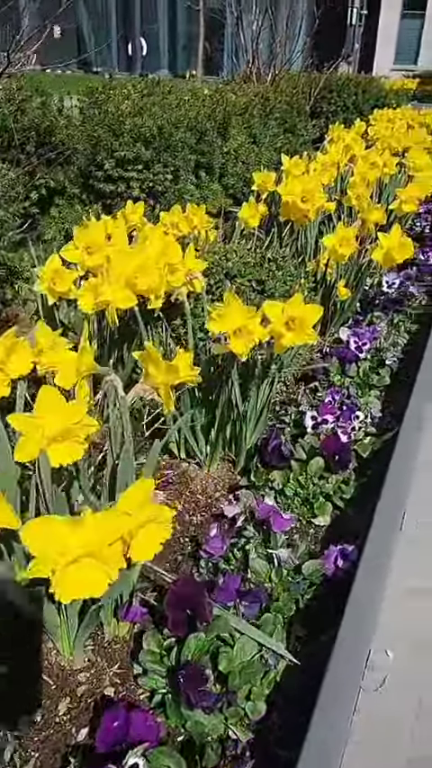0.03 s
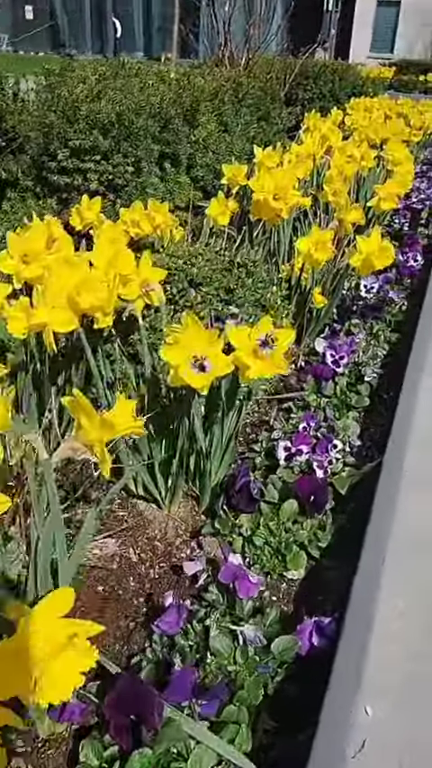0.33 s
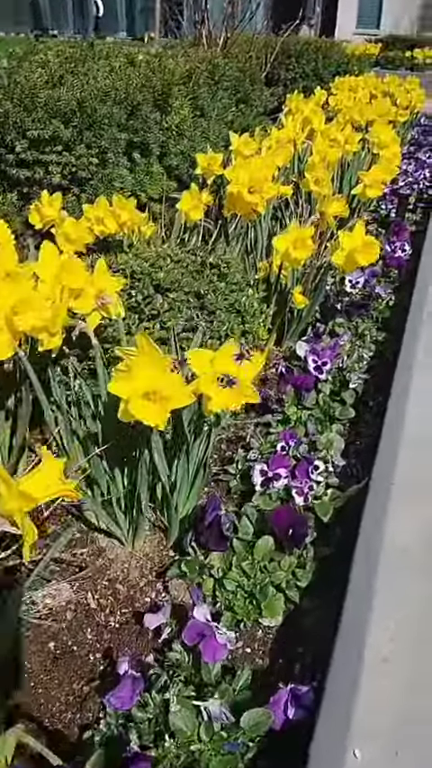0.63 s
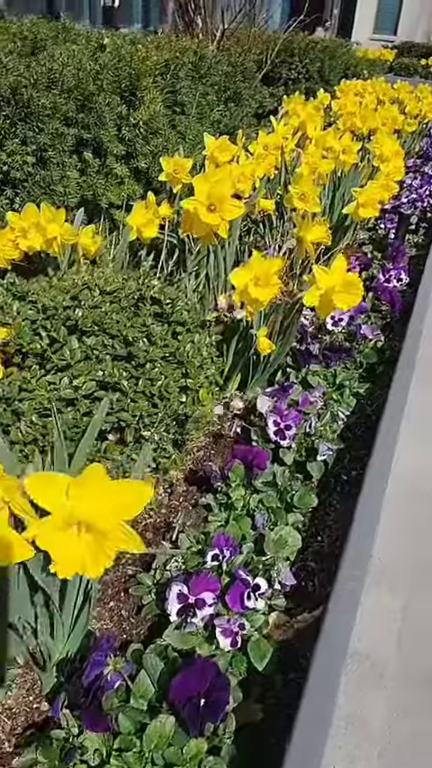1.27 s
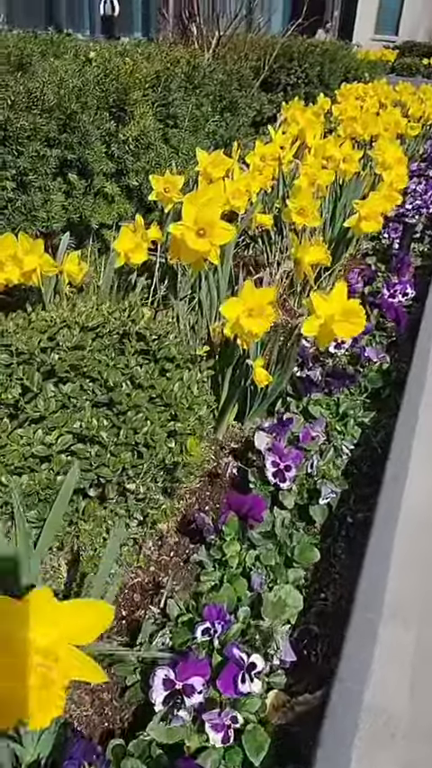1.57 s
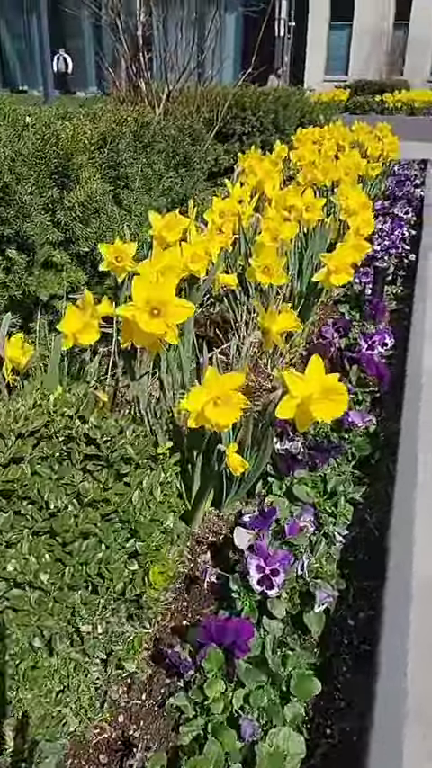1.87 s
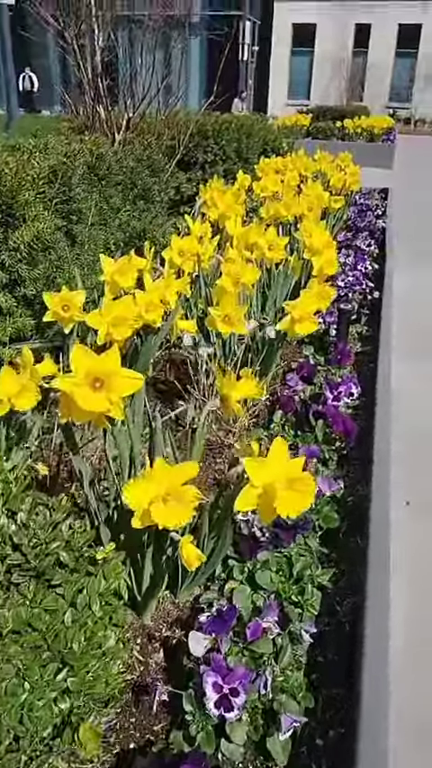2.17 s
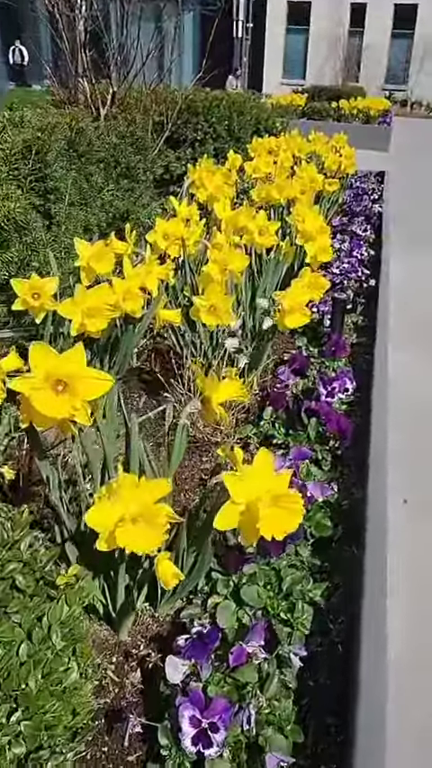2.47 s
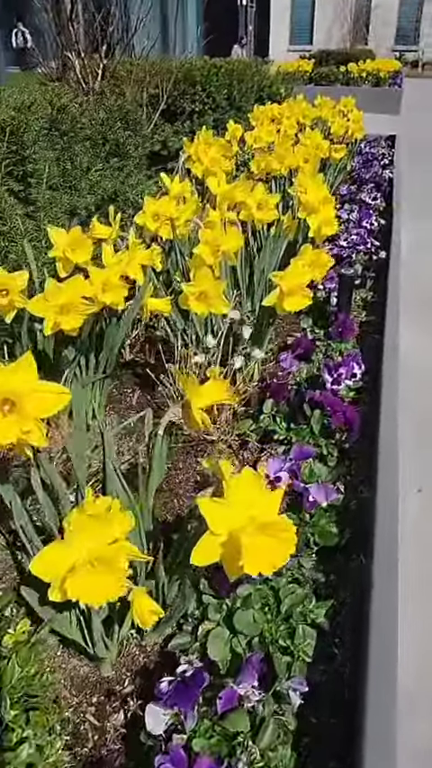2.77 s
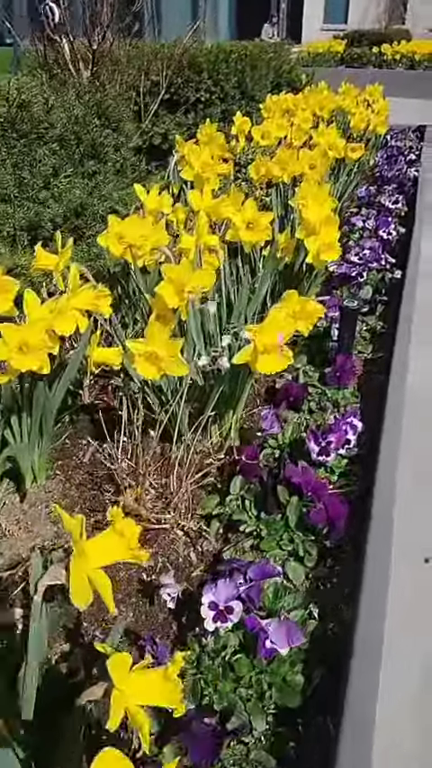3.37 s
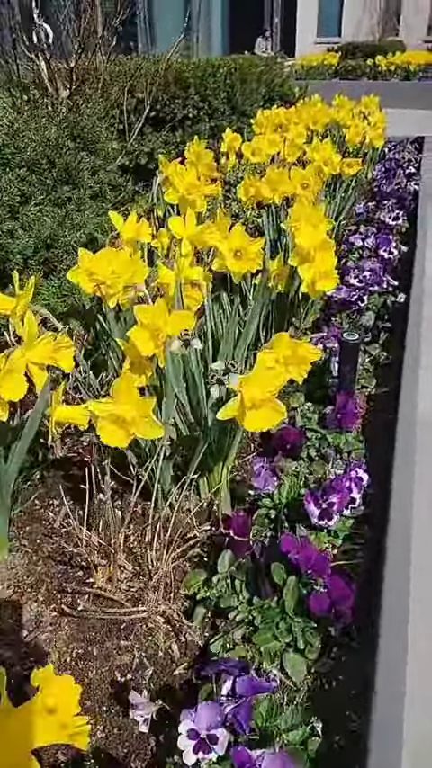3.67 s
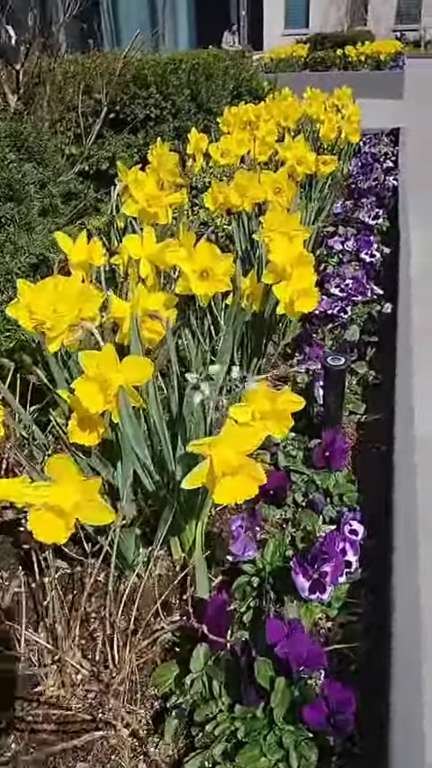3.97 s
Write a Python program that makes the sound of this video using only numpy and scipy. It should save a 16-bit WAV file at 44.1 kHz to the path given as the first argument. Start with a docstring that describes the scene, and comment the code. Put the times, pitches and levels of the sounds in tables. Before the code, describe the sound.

Birds sing in a quiet garden. One near the microphone, to the left, runs through a quick phrase of trills, chips and whistles, then leaves only distant birds calling softly, with a slight echo and faint steady hush.

```python
"""Songbirds in a garden

A bird close by on the left sings one phrase with both sides of its syrinx, two independent oscillators:
a burr, chips, paired whistles and an arch. Farther birds answer with thin buzzes, slurs and low whistles.
Walls and hedges reflect the song over a faint, steady background hush."""
import sys
import numpy as np
from scipy import signal
from scipy.fft import rfft, irfft
from scipy.io import wavfile
from scipy.ndimage import uniform_filter1d

SR = 44100
rng = np.random.default_rng(int(sys.argv[2]) if len(sys.argv) > 2 else 0)


def unload_wav(signal):
    """Save mono or channel-first audio to the path in sys.argv[1] as 16-bit WAV at rate SR, clipped to [-1, 1]."""
    wavfile.write(
        sys.argv[1],
        SR,
        np.round(np.clip(np.atleast_2d(signal).T, -1, 1) * 32767).astype(np.int16),
    )


N = 176400
NEAR_EDGE_S, FAR_ATTACK_S, FAR_RELEASE_S = 0.002, 0.004, 0.028
EARLY_DELAY_S, TAIL_DELAY_S = 0.003, 0.024
ANTIPHASE = np.array([[1], [-1]])


def undb(db):
    """Amplitude ratio of a level in decibels."""
    return 10 ** (np.asarray(db) / 20)


def unit(x):
    """Normalisation to unit rms."""
    return x / np.sqrt(np.mean(x ** 2))


def jitter(rate, size):
    """Interpolated noise of about unit spread, with rate new values a second."""
    at = np.arange(size) * rate / SR
    return 1.2 * np.interp(at, np.arange(N // 10), rng.standard_normal(N // 10))


def colour(x, points):
    """Zero-phase filtering through (f/Hz, gain/dB) points."""
    hz, db = np.array(points, float).T
    f = np.maximum(np.arange(N // 2 + 1) * SR / N, 1)
    return irfft(rfft(x) * undb(np.interp(np.log(f), np.log(hz), db)), N)


def pan(db):
    """Interaural level difference as two gains; positive is left."""
    return undb(ANTIPHASE * db / 2)


def add(track, start, x):
    """Superposition of x on a track from a start time in seconds."""
    i = int(start * SR)
    a, b = max(i, 0), min(i + len(x), N)
    if b > a:
        track[a:b] += x[a - i:b - i]


def contours(rows):
    """Linear interpolation of a note's rows in time, one curve per column."""
    times, *columns = np.array(rows, float).T
    times = np.sort(times)
    t = np.arange(times[0], times[-1] + NEAR_EDGE_S, 1 / SR)
    return [np.interp(t, times, c) for c in columns]


# Faint background hush, with a thin hiss in the top treble: f/Hz, relative level/dB
HUSH_SPECTRUM = [(35, -48), (69, -27.5), (190, -38), (438, -28.5), (520, -22), (950, -9), (1350, -13.5),
                 (2100, -7.5), (4350, -6.5), (5860, -5.5), (6810, -14), (7520, -9), (8310, -11),
                 (12700, -12), (15500, -17)]
# Spread of the hush in the mix, with the thin hiss centred: f/Hz, side level re mid/dB
HUSH_SPREAD = [(60, -16), (200, 0), (700, -4.5), (1300, 0), (4400, -3), (7500, 1), (9000, -27.5),
               (15000, -38)]


def hush():
    """Stationary noise, partly coherent between channels: centred in the bass and top treble."""
    mid, side = (unit(colour(rng.standard_normal(N), HUSH_SPECTRUM)) for _ in range(2))
    return undb(-57.5) * (mid + colour(side, HUSH_SPREAD) * ANTIPHASE)


# Second and third harmonics: level re fundamental/dB
HARMONICS = [-37.5, -46.5]


def syrinx(hz, db, roughness, attack=NEAR_EDGE_S, release=NEAR_EDGE_S):
    """One side of a syrinx: a nearly sinusoidal oscillator, roughened by random modulation."""
    jitter_hz, pitch_spread, level_spread_db = 500, 0.0565, 7.5
    t = np.arange(len(hz)) / SR
    hz = hz * (1 + pitch_spread * roughness * jitter(jitter_hz, len(t)))
    db = db + level_spread_db * roughness * jitter(jitter_hz, len(t))
    phase = 2 * np.pi * np.cumsum(hz) / SR
    overtones = sum(undb(d) * np.sin(k * phase) * (k * hz < SR / 2) for k, d in enumerate(HARMONICS, 2))
    gate = np.clip(t / attack, 0, 1) * np.clip((t[-1] - t) / release, 0, 1)
    return np.sqrt(2) * (np.sin(phase) + overtones) * gate * undb(db)


# Far gliding notes: t/s, duration/s, first f/Hz, last f/Hz, source level/dB, roughness (0-1)
FAR_SLURS = [(0, 0.083, 2700, 2550, -52.5, 0.51), (0.469, 0.24, 1931, 1796, -58.5, 0.56),
             (0.703, 0.053, 5594, 5260, -46, 0.14), (2.019, 0.077, 2460, 2457, -65.5, 0),
             (2.05, 0.055, 5160, 4420, -59, 0), (2.25, 0.13, 3070, 3150, -68, 0.58),
             (2.328, .045, 5770, 5150, -63, 0.2), (2.424, 0.08, 5700, 4830, -61, 0.1),
             (2.53, 0.057, 3570, 3610, -62, 0.5), (2.748, 0.11, 3590, 3435, -67, .3),
             (2.605, 0.11, 5400, 4570, -62, 0.1), (0.799, 0.34, 4326, 4467, -52.5, 0.23),
             (2.891, 0.25, 2144, 2076, -64, 0.18), (3.31, 0.1, 2480, 2470, -56, 0.24),
             (3.45, 0.085, 2480, 2483, -57.5, 0.13), (3.391, 0.15, 5540, 4480, -61.5, 0.3),
             (3.533, 0.12, 2158, 1993, -61.5, 0.3), (3.633, .12, 5220, 4350, -64, 0.65),
             (2.994, 0.051, 4300, 4150, -62, 0.4), (3.673, 0.41, 2254, 2312, -57, 0.14),
             (3.809, 0.064, 2383, 2338, -57.5, 0.26)]


def slurs():
    """Power-law frequency glides: fast at first, then levelling out."""
    song = np.zeros(N)
    for start, length, first, last, db, roughness in FAR_SLURS:
        t = np.arange(0, length, 1 / SR)
        hz = last + (first - last) * (1 - t / length) ** 2.3
        add(song, start, syrinx(hz, db, roughness, FAR_ATTACK_S, FAR_RELEASE_S))
    return song


# Far thin buzzes: t/s, duration/s, carrier f/Hz, source level/dB, deviation/Hz
FAR_BUZZES = [(0, 0.046, 7570, -54, 314), (0.163, 0.097, 7690, -55.5, 250), (0.319, 0.12, 7420, -54, 208),
              (0.394, 0.22, 7330, -60.5, 148), (3.217, 0.085, 7720, -57.5, 416),
              (3.234, 0.09, 6870, -56.5, 320), (3.39, 0.11, 7760, -55, 331),
              (3.43, 0.091, 7070, -55.5, 400), (3.585, 0.13, 7590, -52.5, 280),
              (3.64, 0.06, 6910, -52.5, 350), (3.9, 0.11, 7570, -64, 410)]


def buzzes(rate_hz=100, roughness=0.548):
    """Fast frequency modulation spreads a high carrier into sidebands, heard as a buzz."""
    song = np.zeros(N)
    for start, length, carrier, db, deviation in FAR_BUZZES:
        t = np.arange(0, length, 1 / SR)
        hz = carrier + deviation * np.sin(2 * np.pi * rate_hz * t)
        add(song, start, syrinx(hz, db, roughness, FAR_ATTACK_S, FAR_RELEASE_S))
    return song


# Near trilled notes, by name: t/s, carrier f/Hz, source level/dB, deviation/Hz, trill rate/Hz
NEAR_TRILLS = { "burr lead-in": [(.07, 2690, -50, 152, 110), (.094, 2640, -34, 150, 83),
               (.103, 2950, -39.5, 97, 68), (.16, 2940, -49.5, 151, 114)],
               "burr": [(.094, 1920, -46, 146, 59), (.115, 1970, -39, 252, 60.5),
               (.142, 2180, -29.5, 238, 78), (.178, 2176, -34, 230, 102), (.228, 2170, -36.5, 210, 125),
               (.243, 2150, -33.5, 200, 130), (.28, 2086, -36.5, 190, 100), (.33, 2016, -33, 159, 99.5),
               (.385, 1865, -34.5, 134, 109), (.43, 1771, -44.5, 90, 170), (.45, 1760, -60, 60, 100)],
               "burr upper": [(.24, 2400, -46, 207, 93), (.28, 2414, -39, 256, 95),
               (.31, 2700, -44, 304, 100), (.365, 2843, -43.5, 203, 108), (.405, 2480, -47.5, 202, 104),
               (.43, 2185, -54, 98, 100)], "rasp": [(.815, 2635, -51, 412, 390),
               (.845, 2928, -44, 480, 470), (.885, 3774, -39.5, 462, 520), (.915, 4130, -56, 400, 310)],
               "scratch": [(1.552, 3307, -44, 637, 310), (1.58, 3264, -44, 450, 216),
               (1.593, 3590, -47, 403, 290)], "quaver low": [(1.288, 3144, -49.5, 83, 130),
               (1.305, 3460, -42, 180, 98), (1.34, 3580, -46, 180, 120), (1.38, 3480, -43, 12.4, 56),
               (1.403, 3500, -42.5, 13, 99), (1.412, 3500, -56, 10, 200)],
               "quaver high": [(1.288, 4890, -38.5, 120, 64), (1.305, 5590, -43.5, 700, 125),
               (1.333, 5220, -43, 210, 138), (1.347, 4780, -39.5, 100, 200), (1.372, 4700, -37, 20, 200),
               (1.401, 4676, -39, 6, 110), (1.408, 4820, -58, 8.7, 150)], }


def trills(roughness=0.22):
    """Frequency and amplitude modulation in phase: the level pulses as the pitch swings."""
    song = np.zeros(N)
    for rows in NEAR_TRILLS.values():
        hz, db, deviation, rate = contours(rows)
        swing_hz = deviation * np.sin(2 * np.pi * np.cumsum(rate) / SR)
        pulse_db = 42 * swing_hz / hz
        add(song, rows[0][0], syrinx(hz + swing_hz, db + pulse_db, roughness))
    return song


# Airy skirt of the near voice: f/Hz, relative level/dB
BREATH_SPECTRUM = [(1200, -10), (1900, -7), (3000, -2.5), (4500, 8), (6000, -2), (7000, -9.5), (8000, -2.5),
                   (9200, -5), (12500, -24.5), (15000, -22)]


def breath(song):
    """Noise modulated by the song's rms slope: loud, high notes take more air."""
    force = np.sqrt(np.abs(uniform_filter1d(np.gradient(song) ** 2, size=200)))
    return undb(-10.5) * force * unit(colour(rng.standard_normal(N), BREATH_SPECTRUM))


# Coupling of the two voices: f/Hz, gain/dB
VOICE_COUPLING = [(2000, -87), (4500, -38), (7500, -40), (9700, -20), (12000, -30.5)]


def sum_tones(song):
    """A quadratic nonlinearity doubles each frequency and makes sum tones where voices overlap."""
    envelope = np.sqrt(np.abs(uniform_filter1d(song ** 2, size=200)) + 1e-12)
    return colour(song ** 2 / envelope, VOICE_COUPLING)


# Hiss above the near bird's harshest notes: t/s, duration/s, centre f/Hz, source level/dB
NEAR_SIZZLES = [(.28, 0.17, 11900, -58), (0.673, 0.029, 7900, -53), (1.498, .11, 7760, -55.5),
                (1.782, 0.065, 7350, -59)]


def sizzles():
    """Band-pass noise in puffs that swell and fade."""
    puffs = np.zeros(N)
    for start, length, hz, db in NEAR_SIZZLES:
        t = np.arange(0, length, 1 / SR)
        b, a = signal.iirpeak(hz, Q=4.5, fs=SR)
        hiss = unit(signal.filtfilt(b, a, rng.standard_normal(N)))[:len(t)]
        add(puffs, start, undb(db) * hiss * np.sqrt(np.sin(np.pi * t / length)))
    return puffs


# Far falling "teer" calls: t/s, duration/s, source level/dB
FAR_TEERS = [(0.515, .19, -51), (3.772, 0.13, -50), (3.907, .14, -49.5)]


def teers(top_hz=6280, end_hz=5310, fall_at_s=0.026, fall_s=0.0067, roughness=0.044):
    """A logistic frequency glide settles on one pitch, with random upward flicks."""
    song = np.zeros(N)
    for start, length, db in FAR_TEERS:
        t = np.arange(0, length, 1 / SR)
        glide_hz = end_hz + (top_hz - end_hz) / (1 + np.exp((t - fall_at_s) / fall_s))
        flicks_hz = 199 * np.maximum(jitter(rate=300, size=len(t)), 0)
        hz = np.minimum(glide_hz + flicks_hz, top_hz)
        add(song, start, syrinx(hz, db, roughness, FAR_ATTACK_S, FAR_RELEASE_S))
    return song


# Near chips and whistles, by name: t/s, f/Hz, source level/dB, roughness (0-1)
NEAR_WHISTLES = { "double chip": [(.645, 2530, -39, 0.2), (.65, 3100, -39, 0), (.656, 2500, -52, 0.4),
                 (.661, 3370, -40.5, 0.22), (.668, 2560, -40.5, 0.5), (.682, 1880, -54, 0.33)],
                 "chip": [(.733, 2830, -44, 0), (.738, 3360, -40.5, 0.4), (.744, 2457, -39, 0.46),
                 (.76, 1890, -52, 0.34)], "double chip high": [(.669, 4530, -45, 0.2),
                 (.686, 2910, -49, 0.6)], "chip high": [(.747, 4700, -43, 0.7), (.763, 3330, -52.5, 0.4)],
                 "rise low": [(.868, 1637, -56, 0.55), (.89, 2024, -43.5, 0.1), (.91, 2452, -41.5, 0.08),
                 (.93, 2514, -44, 0.14), (.99, 2552, -38, 0.06), (1.05, 2607, -37.5, 0.01),
                 (1.126, 2653, -42.5, 0.08), (1.152, 2640, -76, 0)], "rise high": [(.885, 2410, -45, 0.7),
                 (.91, 3230, -36.5, 0.05), (.96, 3557, -34.5, 0.22), (1.01, 3660, -40.5, 0.35),
                 (1.08, 3867, -42.5, 0), (1.128, 3995, -42, 0.08), (1.14, 3890, -47, 0.25)],
                 "tick": [(1.156, 5940, -44.5, .4), (1.17, 6020, -46.5, 0.58), (1.2, 6050, -62, 0.54)],
                 "pip": [(1.179, 4764, -40, 0.6), (1.187, 4380, -38, 0.23), (1.197, 4203, -26.5, 0),
                 (1.204, 3920, -43, .05), (1.208, 4200, -56, 0.2)], "pip low": [(1.163, 2903, -48, 0.5),
                 (1.174, 2622, -48, 0), (1.183, 2034, -47.5, 0.2), (1.207, 1880, -56, 0.1)],
                 "scoop": [(1.469, 3620, -43, 0), (1.473, 2950, -45.5, 0.3), (1.488, 2780, -45.5, 0.36),
                 (1.492, 3300, -37, 0.42), (1.497, 5400, -40.5, 0.3), (1.505, 6400, -49, 0.45),
                 (1.525, 6080, -36.5, 0.13), (1.536, 6050, -46, 0.13), (1.545, 5595, -43, .5),
                 (1.55, 4000, -28.5, 0.65), (1.555, 2700, -40.5, 0.14)],
                 "scoop low": [(1.472, 1900, -62, 0.4), (1.492, 2210, -48.5, 0.04), (1.51, 2420, -56, 0.7)],
                 "slide": [(1.494, 4360, -46, 0), (1.504, 4180, -28, 0.2), (1.518, 3850, -41, 0.2),
                 (1.532, 3910, -43, 0.3), (1.546, 3360, -38, 0.1)], "swell": [(1.583, 3363, -59, 0.48),
                 (1.597, 3900, -39, 0.34), (1.612, 4260, -32, 0.02), (1.627, 4204, -33, 0),
                 (1.66, 3920, -34.5, 0), (1.675, 3860, -39.5, 0.03), (1.683, 3900, -58, .1)],
                 "swell high": [(1.587, 4590, -41, 0.15), (1.595, 4760, -33, 0.36),
                 (1.61, 5250, -43.5, 0.26), (1.622, 5525, -42, 0.23), (1.675, 5410, -43.5, 0.26)],
                 "peak": [(1.787, 3306, -60, 0.4), (1.796, 4190, -37.5, 0), (1.802, 5424, -46, 0.35),
                 (1.81, 4140, -35, 0.09), (1.815, 3520, -54, .2)], "arch": [(1.851, 2706, -56.5, 0.02),
                 (1.861, 3680, -45.5, 0.15), (1.866, 4340, -36, 0.04), (1.876, 5013, -49.5, 0.1),
                 (1.905, 5710, -39, 0.47), (1.931, 5650, -41, 0.55), (1.938, 5400, -38, 0.59),
                 (1.946, 4660, -39, 0.43), (1.956, 4266, -39, 0.22), (1.964, 3570, -65, 0.05)], }


def whistles():
    """Biphonation: the two sides of the syrinx follow separate pitch contours, often at once."""
    song = np.zeros(N)
    for rows in NEAR_WHISTLES.values():
        add(song, rows[0][0], syrinx(*contours(rows)))
    return song


def echoes(x, delay_s, t60_s):
    """Diffuse reflections decay exponentially, in two uncorrelated channels."""
    t = np.arange(SR) / SR
    response = rng.standard_normal((2, SR)) * (t > delay_s) * np.exp(-np.log(1000) * t / t60_s)
    response /= np.sqrt(np.sum(response ** 2, axis=1, keepdims=True))
    return signal.fftconvolve(x[None], response, axes=1)[:, :N]


def far_birds(width=0.7):
    """Beyond the critical distance reflections outweigh direct sound; ahead, slightly right."""
    song = slurs() + buzzes() + teers()
    early = undb(0.5) * echoes(song, EARLY_DELAY_S, t60_s=0.26)
    tail = undb(-1.5) * echoes(song, TAIL_DELAY_S, t60_s=1)
    mid, side = early + tail
    return undb(-1.5) * pan(-0.5) * (undb(-4) * song + mid + width * side * ANTIPHASE)


# Response of the near bird's throat: f/Hz, gain/dB
VOCAL_TRACT = [(300, -55), (1100, -4.5), (1700, -0.5), (6200, -0.5), (6800, -4), (7700, -2), (8800, -3.5),
               (10200, 7), (11300, 10.5), (13000, -4.5)]
# Stereo narrowing in the mix, so the song's highest treble is heard in the centre: f/Hz, side gain/dB
MIX_NARROWING = [(6500, 1.5), (8500, -30), (15000, -33)]


def near_bird():
    """Source and filter: the throat colours the voices, and direct sound dominates from the left."""
    source = trills() + whistles()
    song = colour(source + sum_tones(source) + breath(source), VOCAL_TRACT) + sizzles()
    early = undb(-5.5) * echoes(song, EARLY_DELAY_S, t60_s=0.14)
    tail = undb(-6) * echoes(song, TAIL_DELAY_S, t60_s=0.65)
    left, right = undb(-1.33) * (song * pan(8) + (early + tail) * pan(5.5))
    return (left + right + colour(left - right, MIX_NARROWING) * ANTIPHASE) / 2


def scene():
    """Linear superposition of the hush and the birds."""
    return hush() + far_birds() + near_bird()


def record(dry):
    """Band limiting: a steep elliptic low-pass cuts the highest treble."""
    cutoff_hz = 15750
    return signal.sosfilt(signal.ellip(10, .2, 70, cutoff_hz, fs=SR, output="sos"), dry)


dry = scene()
out = record(dry)
unload_wav(out)
```